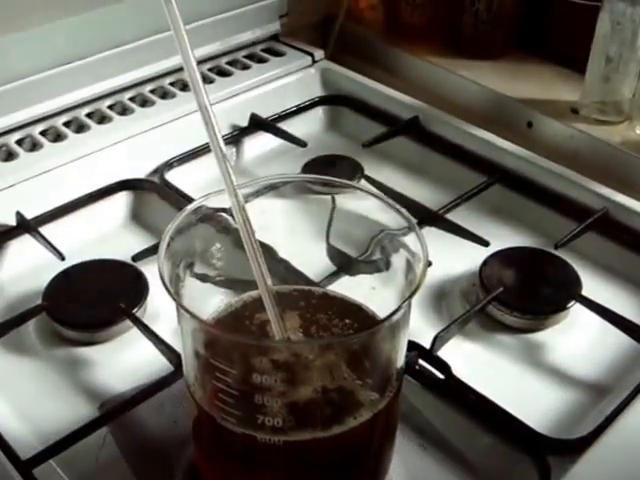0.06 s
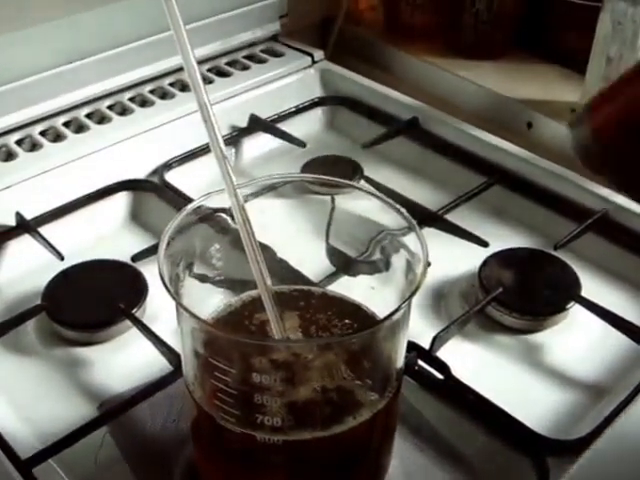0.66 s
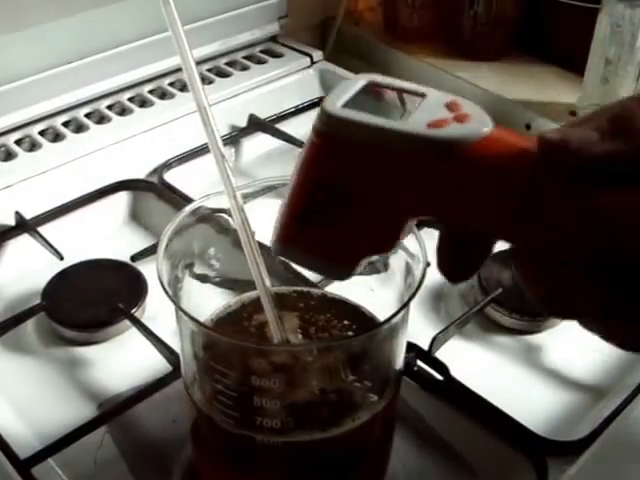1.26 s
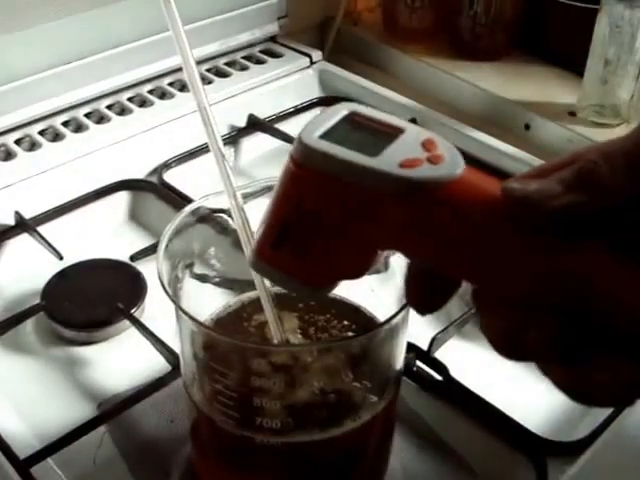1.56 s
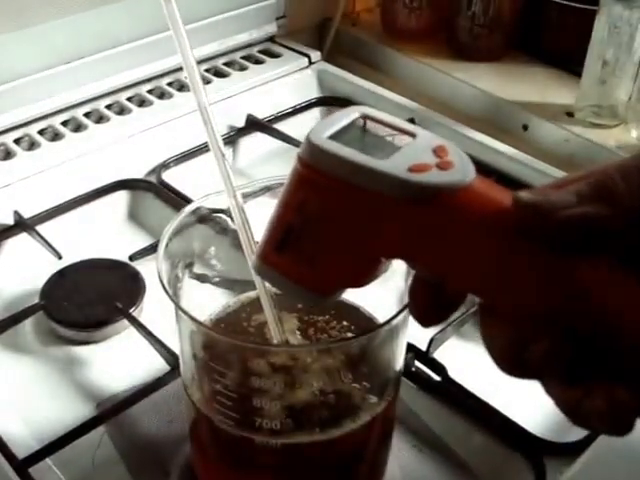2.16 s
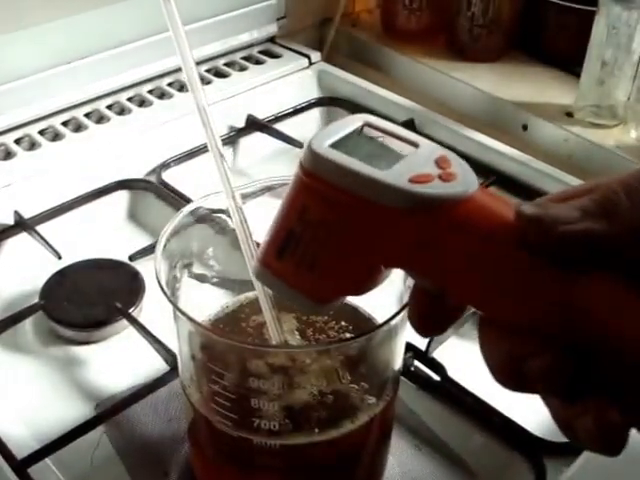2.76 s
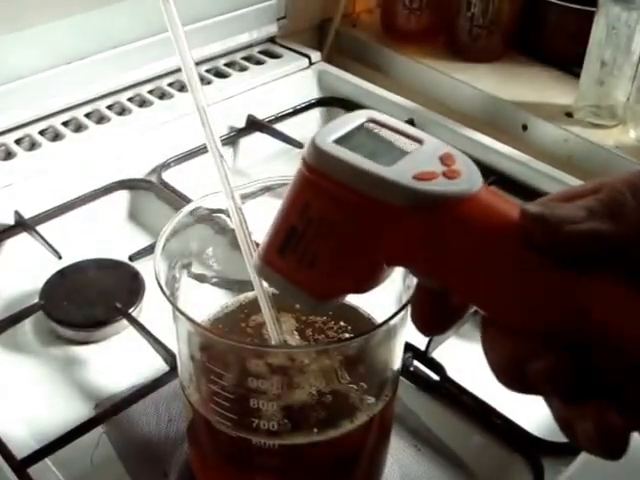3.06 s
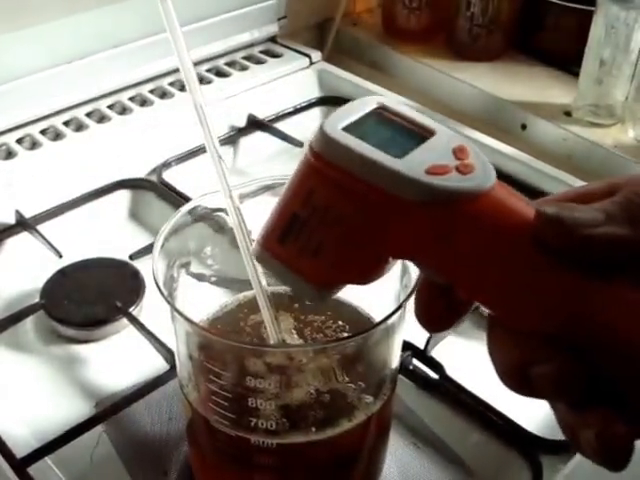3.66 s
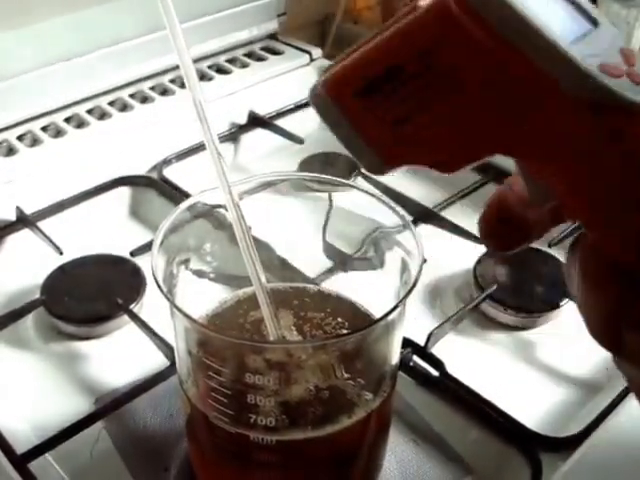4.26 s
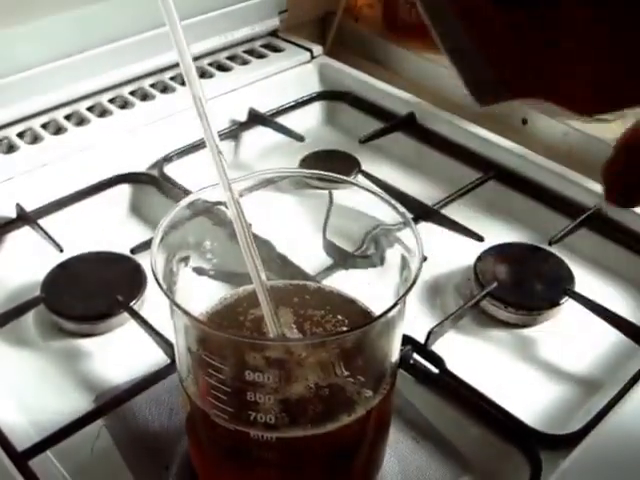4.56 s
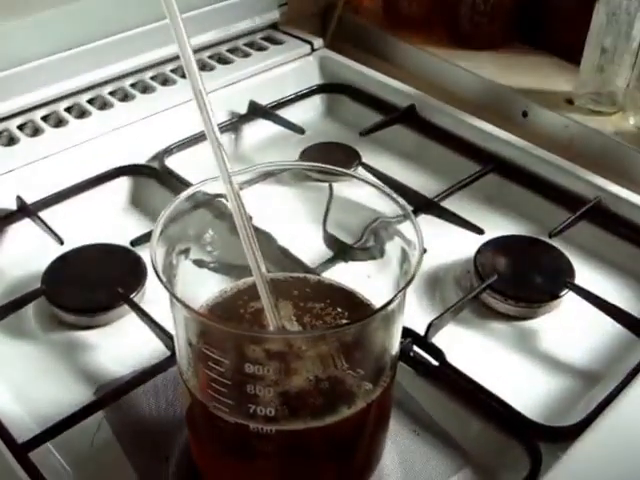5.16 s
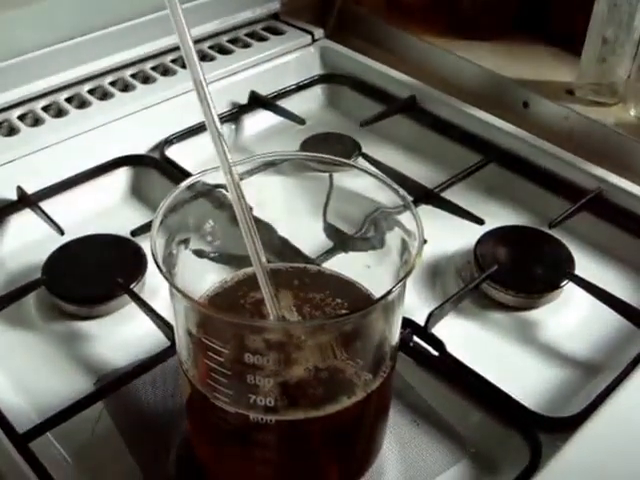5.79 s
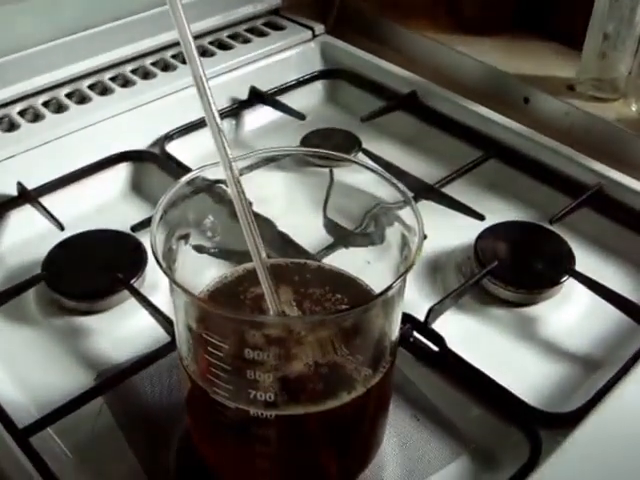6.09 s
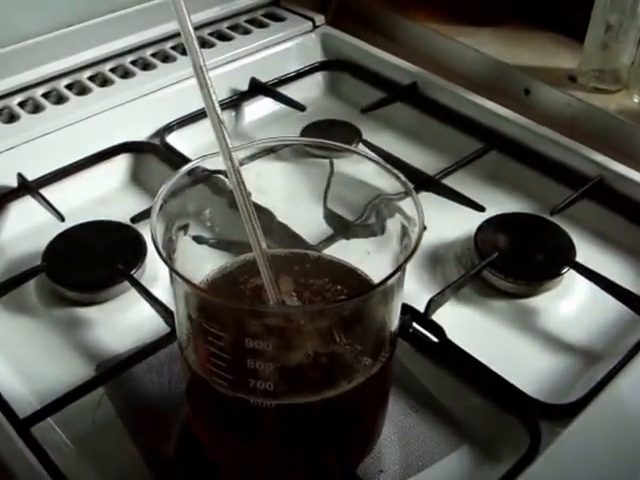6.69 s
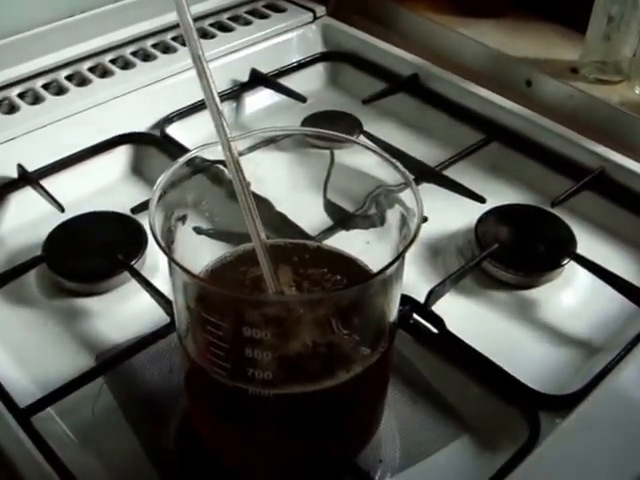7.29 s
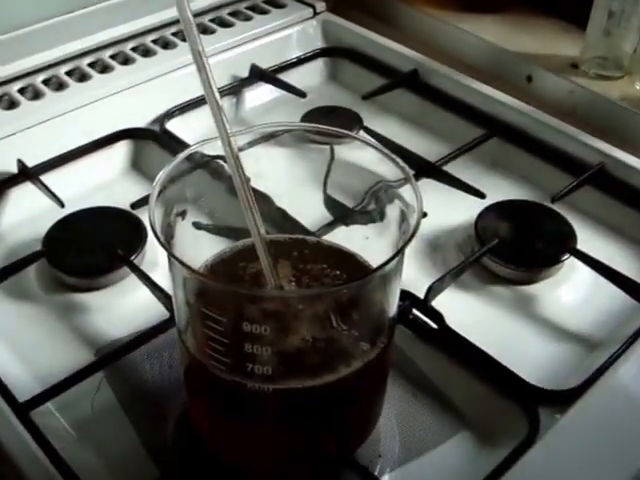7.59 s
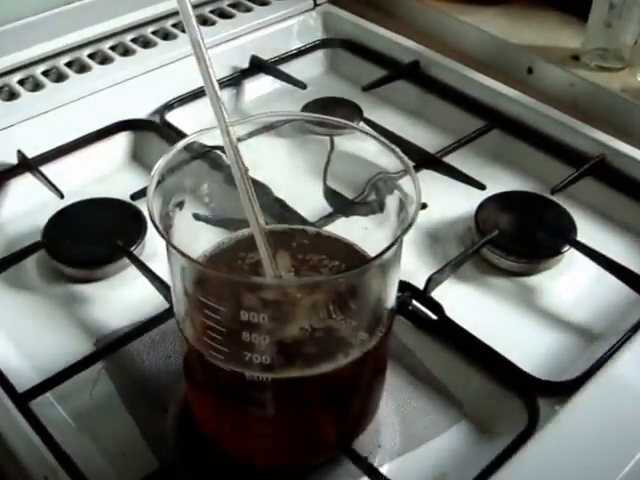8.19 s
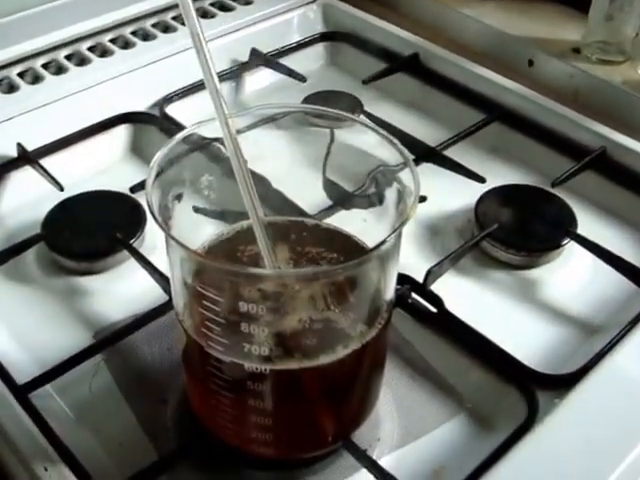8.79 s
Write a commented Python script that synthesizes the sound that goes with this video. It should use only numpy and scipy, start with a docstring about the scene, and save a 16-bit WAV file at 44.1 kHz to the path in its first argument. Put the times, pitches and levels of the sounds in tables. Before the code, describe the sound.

A gas flame roars softly and hisses under finely fizzing oil, with two plastic trigger clicks, then a light tap and rustle.

```python
"""A gas flame roars softly and its jet hisses under a glass beaker of simmering oil, close by in mono.
Turbulent noise excites the hollows of the burner and the pipe resonances of the jet, while tiny bubbles
ring in the oil as a fine fizz. The plastic trigger of a hand-held thermometer clicks when pressed and
again when released, echoing in a small kitchen; then the tool is put aside with a tap and a rustle."""
import sys
import numpy as np
from scipy import signal
from scipy.fft import rfft, irfft, next_fast_len
from scipy.io import wavfile

SR = 44100
rng = np.random.default_rng(int(sys.argv[2]) if len(sys.argv) > 2 else 0)


def unload_wav(signal):
    """Save mono or channel-first audio to the path in sys.argv[1] as 16-bit WAV at rate SR, clipped to [-1, 1]."""
    wavfile.write(
        sys.argv[1],
        SR,
        np.round(np.clip(np.atleast_2d(signal).T, -1, 1) * 32767).astype(np.int16),
    )


N = 394254


# Spectrum of the flame's roar. Each row: frequency in Hz, spectral level in dB.
ROAR_SPECTRUM = [(25, -114), (55, -105), (90, -98), (130, -87.5), (165, -89), (260, -85), (470, -84),
                 (800, -82.5), (1200, -84), (1750, -85.5), (2100, -99), (3000, -106), (6000, -125)]
# Cavity modes of the burner and the gap under the beaker.
# Each row: frequency in Hz, bandwidth in Hz, peak spectral level in dB.
CAVITY_MODES = [(127.3, 32, -95.5), (570.5, 53, -78.5), (953.3, 28, -81), (1100, 29, -80),
                (1210.5, 32, -80.5), (1306.6, 48, -74.5), (1384, 91, -73), (1487, 65, -74),
                (1560.6, 61, -73.5), (1629, 68, -77), (1748, 110, -86), (2005, 65, -97)]
# Swell of the cavity tone. Each row: time in seconds, gain in dB.
CAVITY_SWELL = [(0, 0.5), (0.43, 1.5), (0.58, -0.2), (0.95, 0), (1.1, 0), (1.6, 0), (2.03, -1), (2.3, 0.9),
                (2.85, -0.7), (3.12, 2.5), (3.9, -1.8), (4.55, 0), (5.35, 0.7), (5.6, 1), (6.1, 0.1),
                (6.5, -1), (7.3, 1.5), (7.65, 1.5), (8.35, -0.3), (8.64, 1), (8.9, 0.9)]

def flame():
    """Combustion noise: a broadband roar, with cavity resonances that flutter, swell and sink."""
    roar = coloured(white(), ROAR_SPECTRUM) * from_db(0.5 * drift(8.0))
    cavities = noise_bands(CAVITY_MODES, waver_db=1.36, waver_rate=20)
    return roar + gain_curve(CAVITY_SWELL) * cavities


# Spectrum of the jet's hiss. Each row: frequency in Hz, spectral level in dB.
HISS_SPECTRUM = [(900, -110), (2000, -92), (2650, -94.5), (3050, -88.5), (4100, -92.5), (5300, -94),
                 (6700, -98.5), (7900, -97), (8850, -99), (10000, -99)]
# Pipe resonances and the strongest whistle.
# Each row: frequency in Hz, bandwidth in Hz, peak spectral level in dB.
PIPE_MODES = [(3407, 108, -82.5), (3657, 250, -85.5), (4378, 190, -83.5), (7490, 720, -91.5),
              (8270, 500, -94.5), (9360, 280, -87), (9640, 390, -91)]
WHISTLE_MODE = [(5668, 456, -80)]
# Swell of the whistle. Each row: time in seconds, gain in dB.
WHISTLE_SWELL = [(0, -6), (1.3, -2.5), (1.52, -5.5), (1.9, -1.5), (2.2, -7), (2.8, 0), (4.1, -2.5),
                 (4.4, -6.5), (5.1, -1), (5.37, -6.5), (5.52, -0.5), (5.75, -0.5), (5.95, -5), (6.6, -2),
                 (6.9, -6), (7.17, -1), (7.45, -5), (8.9, -5)]

def gas_jet():
    """Jet turbulence: a bright hiss that excites pipe resonances and a whistle that swells and sinks."""
    whistle = gain_curve(WHISTLE_SWELL) * noise_bands(WHISTLE_MODE, waver_db=1.24, waver_rate=9.0)
    hiss = coloured(white(), HISS_SPECTRUM)
    pipe = noise_bands(PIPE_MODES, waver_db=1.75, waver_rate=3.5)
    return hiss + pipe + whistle


# Two narrow bands of hiss. Each row: frequency in Hz, bandwidth in Hz, peak spectral level in dB.
HISS_BANDS = [(3850, 340, -79.5), (4650, 290, -86.5)]
# Moments when they brighten. Each row: time of the peak in seconds, gain in dB.
BRIGHT_MOMENTS = [(0.1, -3), (7.25, -6), (7.98, -6), (8.65, -2.5)]

def narrow_hiss(slope_db_per_s=15, rest_db=-12):
    """Amplitude modulation: two bands of hiss brighten briefly at the start and toward the end."""
    t = np.arange(N) / SR
    peaks_db = np.max([db - slope_db_per_s * np.abs(t - s) for s, db in BRIGHT_MOMENTS], axis=0)
    return from_db(np.maximum(peaks_db, rest_db)) * noise_bands(HISS_BANDS, waver_db=1.0, waver_rate=3.7)


# Plastic contacts of the thermometer. Each row: start in seconds, relative force on the shell in dB,
# relative crack level in dB, crack centre frequency in Hz.
CONTACTS = [(1.2072, -13, -8.5, 3000), (1.2077, -30, -11, 6700), (1.2105, -38, -1.5, 6860),
            (1.2135, -35, -24, 3280), (1.2155, -36, -12, 7000), (1.2225, -37, -38, 2300),
            (4.1523, -29, -8, 5200), (4.1533, -27, -30, 3000), (4.1570, -36, -15, 3200),
            (4.1582, -33, -6, 4700), (4.1638, -24, -13.5, 3020), (4.1705, -32, -28, 3200),
            (4.1790, -37, -32, 3300), (4.295, -41, -34, 2700), (4.9688, -36, -17, 5600),
            (4.969, -44, -29, 1700), (4.9760, -35, -32, 1700), (5.0000, -49, -26.5, 4630)]
# Modes of its shell. Each row: frequency in Hz, relative level in dB, 60 dB decay time in seconds.
SHELL_MODES = [(635, -15, 0.014), (826, -8.5, 0.017), (1480, -31, 0.007), (1910, -12.5, 0.021),
               (2100, -8.5, 0.024), (2386, -13, 0.032), (2700, -19, 0.028), (3213, -12, 0.027),
               (3410, -11.5, 0.025), (3900, -21, 0.019), (5440, -23, 0.0066), (6820, -19, 0.025),
               (8100, -28, 0.012)]
# Colour of the cracks. Each row: frequency in Hz, gain in dB.
CRACK_COLOUR = [(500, -9), (1300, 2), (2200, -3.5), (3300, -9.5), (4600, -15.5), (6500, -22.5), (7800, -24),
                (10000, -17)]

def thermometer(crack_decay_s=0.0016, crack_width_hz=2600, scatter_db=2.5, contact_hz=7000):
    """Impact excitation: each contact gives a short crack and sets the shell in damped free vibration."""
    t = np.arange(N // 100) / SR
    fade = np.exp(-t / crack_decay_s)
    starts = [round(row[0] * SR) for row in CONTACTS]
    cracks, shell = np.zeros(N), np.zeros(N)
    for at, (_, _, crack_db, crack_hz) in zip(starts, CONTACTS):
        burst = steep_band(rng.standard_normal(len(t)), crack_hz, crack_width_hz)
        cracks[at:at + len(t)] += from_db(crack_db) * rms_one(burst * fade) * np.sqrt(np.mean(fade ** 2))
    # Each contact lands on another spot, so it shares its force differently among the modes.
    scatter = scatter_db * rng.standard_normal((len(CONTACTS), len(SHELL_MODES)))
    force_db = np.array(CONTACTS)[:, 1:2] + scatter
    for k, (hz, db, t60) in enumerate(SHELL_MODES):
        blows = np.zeros(N)
        blows[starts] = from_db(force_db[:, k] + db)
        shell += (-1) ** k * ring(blows, hz, t60)  # neighbouring modes swing in opposite senses
    clicks = from_db(0.5) * shell + coloured(cracks, CRACK_COLOUR)
    # The plastic yields on contact, which rounds off the treble.
    return signal.sosfilt(signal.butter(2, contact_hz, fs=SR, output="sos"), clicks)


def oil(level_db, bubbles_per_s=1500, spread_db=2.5, cycles=7.2):
    """Bubble resonance: tiny bubbles burst at random, each ringing briefly at a pitch set by its size."""
    strengths = from_db(spread_db * np.minimum(rng.exponential(1, N), 4)) * rng.choice([-1, 1], N)
    bursts = strengths * (rng.random(N) < bubbles_per_s / SR)
    pitches_hz = np.geomspace(1800, 9000, 20)
    size_class = rng.integers(0, len(pitches_hz), N)
    fizz = sum(ring(bursts * (size_class == k), hz, cycles / hz) for k, hz in enumerate(pitches_hz))
    return from_db(level_db) * rms_one(fizz)


# Spectrum of the hand's rustle. Each row: frequency in Hz, relative level in dB.
RUSTLE_SPECTRUM = [(500, -28), (2300, -3.5), (4500, -7), (6500, -11), (10000, -15)]
# Slides of the hand as the tool is put aside. Each row: start in seconds, level in dB.
HAND_SLIDES = [(5.03, -50.5), (5.18, -56)]

def handling(attack_s=0.027, hold_s=0.02, release_s=0.059):
    """Sliding friction: the hand rubs the plastic in uneven slips; each slide rises fast and dies away."""
    envelope = sum(from_db(db) * swell(s, attack_s, hold_s, release_s) for s, db in HAND_SLIDES)
    slips = coloured(white(), RUSTLE_SPECTRUM) * from_db(3.5 * drift(60))
    return envelope * rms_one(slips)


# Colour of the kitchen's echo. Each row: frequency in Hz, relative gain in dB.
ECHO_COLOUR = [(200, -1), (700, 9), (1500, 11), (2400, 7.5), (3300, 6.5), (5000, 0), (9000, -0.5)]

def kitchen(x, near_db=-13.5, near_t60=0.048, room_db=-18.5, room_t60=0.23):
    """Reverberation: early reflections off the stove top, then the room's short exponential tail."""
    t = np.arange(SR // 2) / SR
    echo = np.zeros(len(t))
    for db, t60, delay_s in [(near_db, near_t60, .0015), (room_db, room_t60, .014)]:
        decay = np.exp(-np.log(1000) * t / t60) * (t > delay_s)
        tail = coloured(rng.standard_normal(len(t)), ECHO_COLOUR) * decay
        echo += from_db(db) * tail / np.sqrt(np.sum(tail ** 2))
    return x + signal.fftconvolve(x, echo)[:N]


def noise_bands(bands, waver_db, waver_rate):
    """Band-pass filtering: narrow bands of noise, each wavering in level on its own."""
    return sum(from_db(db + waver_db * drift(waver_rate)) * steep_band(white(), hz, width)
               for hz, width, db in bands)


def steep_band(x, hz, width):
    """Cascaded resonance: two band-passes in series, each `width` Hz wide with a peak gain of 1."""
    r = np.exp(-np.pi * width / SR)
    b = np.array([1, 0, -1]) * (1 - r * r) / 2
    a = [1, -2 * r * np.cos(2 * np.pi * hz / SR), r * r]
    return signal.lfilter(b, a, signal.lfilter(b, a, x + 1e-18))


def ring(impulses, hz, t60):
    """Damped oscillator: a unit impulse rings at amplitude 1; a small body radiates no bass."""
    r = np.exp(-np.log(1000) / (t60 * SR))
    w = 2 * np.pi * hz / SR
    return signal.lfilter([.5, 0, -.5], [1, -2 * r * np.cos(w), r * r], impulses + 1e-18)


def white():
    """White noise with unit power per Hz."""
    return rng.standard_normal(N) * np.sqrt(SR / 2)


def coloured(x, spectrum):
    """Spectral shaping: filter x by a curve through (Hz, dB) points."""
    hz, db = np.transpose(spectrum)
    size = next_fast_len(len(x))
    bins = np.maximum(np.fft.rfftfreq(size, 1 / SR), 1)
    gain = from_db(np.interp(np.log(bins), np.log(hz), db))
    return irfft(rfft(x, size) * gain, size)[:len(x)]


def drift(rate_hz):
    """Random fluctuation: noise low-passed at rate_hz, with rms 1."""
    hop, settle = 40, 2000
    r = np.exp(-2 * np.pi * hop * rate_hz / SR)
    noise = rng.standard_normal(N // hop + settle + 2)
    slow = signal.lfilter([1], [1, -2 * r, r * r], noise)[settle:]
    return np.interp(np.arange(N) / hop, np.arange(len(slow)), rms_one(slow))


def swell(start, attack, hold, release):
    """Envelope with a linear rise to 1, a hold and an exponential decay."""
    t = np.arange(N) / SR - start
    return np.clip(t / attack, 0, 1) * np.exp(-np.maximum(t - attack - hold, 0) / release)


def gain_curve(points):
    """Amplitude envelope through (seconds, dB) points."""
    return from_db(np.interp(np.arange(N) / SR, *np.transpose(points)))


def from_db(db):
    """Decibels to amplitude ratio."""
    return 10 ** (np.asarray(db) / 20)


def rms_one(x):
    """Normalisation to rms 1."""
    return x / np.sqrt(np.mean(x ** 2) + 1e-20)


def scene():
    """Superposition: roar, hiss and fizz, swaying a little by chance, and the tool; channels alike."""
    sway_hz = 0.87
    flame_db = 1.2 * drift(sway_hz)
    hiss_db = -0.85 + 0.37 * drift(sway_hz)
    fizz_db = -58.5 + 1.3 * drift(sway_hz)
    roar = from_db(flame_db) * flame()
    hiss = from_db(hiss_db) * (narrow_hiss() + gas_jet())
    return np.tile(roar + hiss + oil(fizz_db) + kitchen(thermometer()) + handling(), (2, 1))


def record(dry):
    """Band limiting: a small microphone with a steep treble cut."""
    cutoff_hz = 10020
    return signal.sosfilt(signal.ellip(12, .1, 70, cutoff_hz, fs=SR, output="sos"), dry)


dry = scene()
out = record(dry)
unload_wav(out)
```